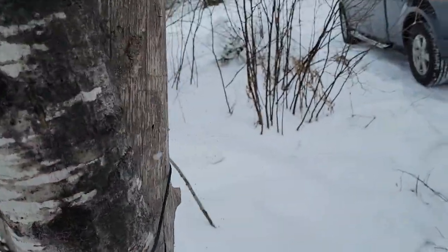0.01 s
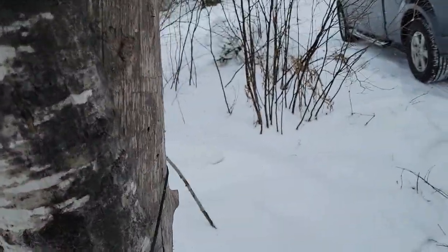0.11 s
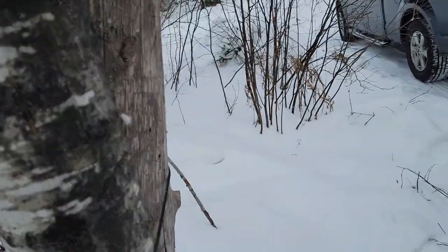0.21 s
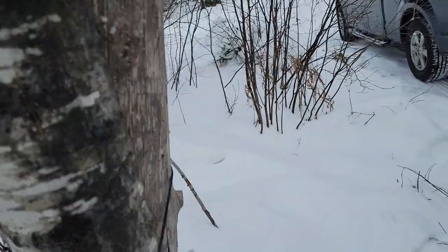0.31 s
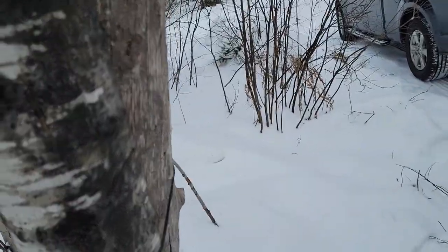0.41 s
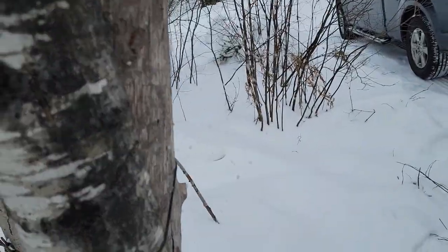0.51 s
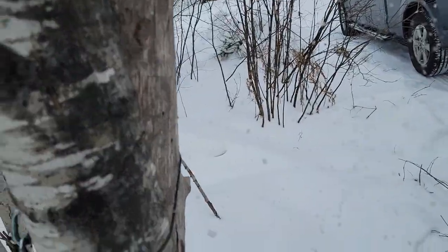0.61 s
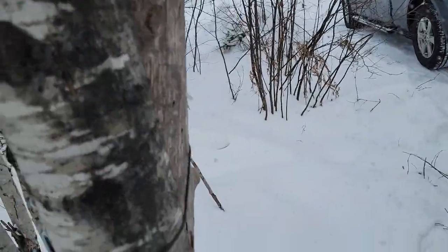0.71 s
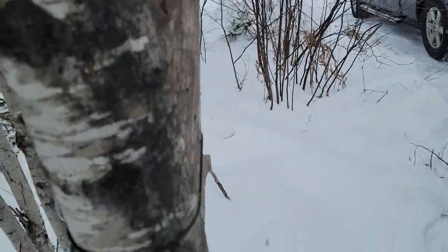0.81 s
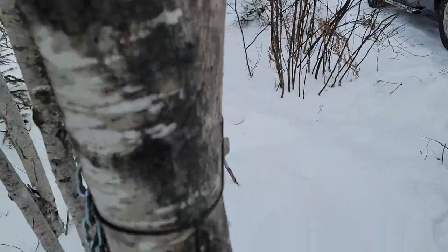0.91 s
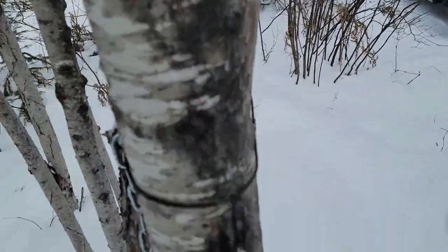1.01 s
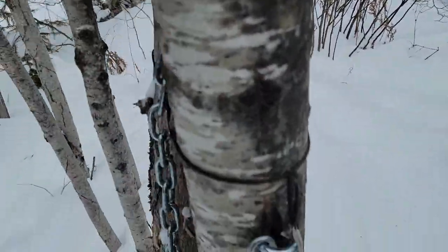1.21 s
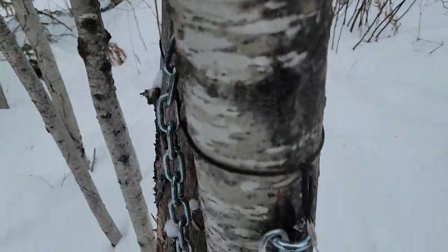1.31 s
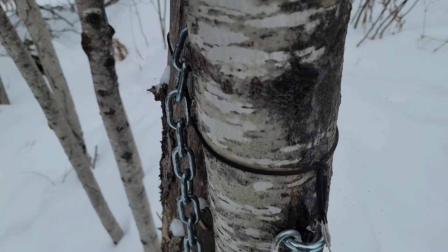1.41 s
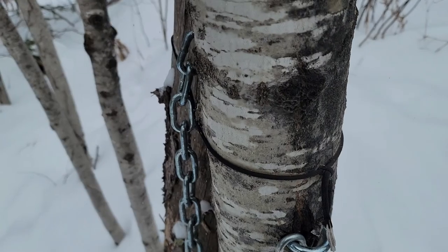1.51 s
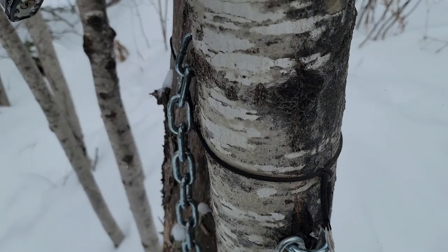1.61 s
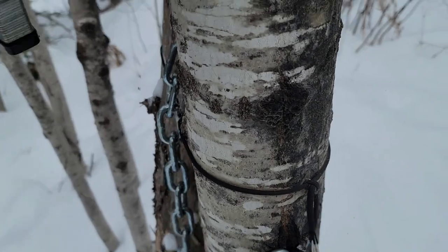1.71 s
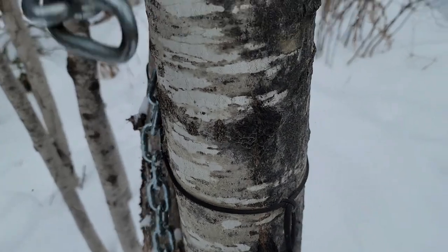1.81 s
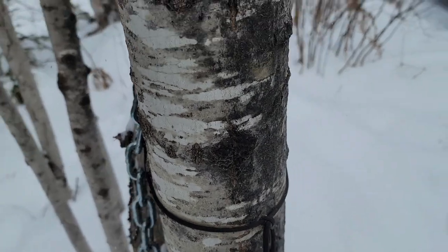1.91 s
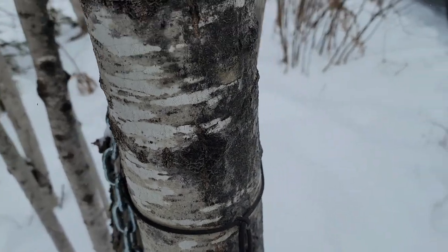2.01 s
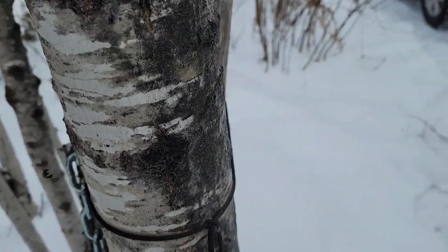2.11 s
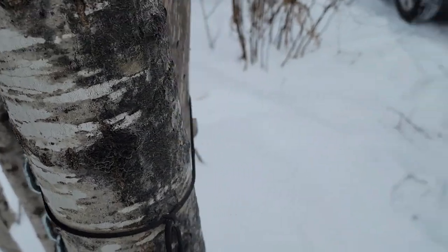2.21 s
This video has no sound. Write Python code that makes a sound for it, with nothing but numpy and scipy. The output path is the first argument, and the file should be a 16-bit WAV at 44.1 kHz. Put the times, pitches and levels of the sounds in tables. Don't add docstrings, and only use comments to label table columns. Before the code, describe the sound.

A steel chain clinks and rattles in thin, very high, short rings as it is lifted and wound around a tree; boots crunch and crack snow, then a link knocks wood. Close stereo phone microphone, open snowy woods.

```python
import sys
import numpy as np
from scipy import signal
from scipy.fft import rfft, irfft
from scipy.io import wavfile
from scipy.ndimage import map_coordinates

SR = 44100
rng = np.random.default_rng(int(sys.argv[2]) if len(sys.argv) > 2 else 0)


def transcribe(signal):
    frames = np.atleast_2d(signal).T
    limited = np.clip(frames, -1, 1)
    pcm = np.round(limited * 32767).astype(np.int16)
    wavfile.write(sys.argv[1], SR, pcm)


def nominal_scale(level):
    x = np.asarray(level, float) / 20
    return 10 ** x


N = 99225
TIME_S = np.arange(N) / SR


def track(points):
    at, value = np.array(points, float).T
    return np.interp(TIME_S, at, value)


def grains(shape, rate):
    scatter_db = 2.5
    chance, size = rng.random((2,) + shape)
    clicks = (chance < rate / SR) * np.sign(chance - rate / SR / 2)
    clicks = clicks * nominal_scale(-scatter_db * np.log(size + 1e-6))
    return clicks / clicks.std()


def colour(x, points):
    hz, db = np.array(points, float).T
    log_hz = np.log(np.linspace(1, SR / 2, 2049))
    cepstrum = irfft(np.interp(log_hz, np.log(hz), db) * np.log(10) / 20)
    cepstrum[1:2048] *= 2
    cepstrum[2049:] = 0
    impulse = irfft(np.exp(rfft(cepstrum)))
    y = signal.fftconvolve(x, impulse)[:len(x)]
    return y / y.std()


def resonance(x, hz, q):
    b, a = signal.iirpeak(hz, q, fs=SR)
    y = signal.lfilter(b, a, signal.lfilter(b, a, x))
    return y / y.std()


def band_pass(x, order, low_hz, top_hz):
    return signal.sosfilt(signal.butter(order, [low_hz, top_hz], "band", fs=SR, output="sos"), x)


def swell(at, db, rise, t60):
    t = TIME_S - at
    climb_db = 40 * t / (3 * max(rise, 0.0005))
    fall_db = -60 * t / max(t60, 0.01)
    return nominal_scale(db + np.where(t < 0, climb_db, fall_db))


def ring(at, hz, db, t60):
    y, start = np.zeros(N), int(at * SR)
    t = np.arange(N - start)[:SR // 2] / SR
    decay = nominal_scale(-60 * t / np.maximum(t60, 0.003)[:, None])
    y[start:start + len(t)] = nominal_scale(db) @ (np.sin(2 * np.pi * np.outer(hz, t)) * decay)
    return y


def ports(x, pan_db, lag_s):
    late = map_coordinates(x, [np.arange(N) - lag_s * SR], order=5, mode="nearest")
    return np.array([x * nominal_scale(pan_db / 2), late * nominal_scale(-pan_db / 2)])


def wind():
    # start_s, level_db
    gust_levels = [
        (0.0, -50.5),
        (1.33, -36),
        (2.25, -60),
    ]
    # freq_hz, level_db (per Hz)
    air_colour = [(12, -61), (20, -47.5), (65, -17), (119, -14.5), (908, -21.5), (3000, -33.5),
                  (3900, -81.5), (6600, -120)]
    # start_s, level_db
    hand_levels = [
        (0.0, -44),
        (0.11, -31.5),
        (1.08, -45.5),
        (1.16, -30),
        (2.25, -55),
    ]
    shared_colour = [(20, -34.5), (62, -3.5), (160, -8.5), (300, -6.5), (900, -70.5), (4000, -120)]
    port_colour = [(20, -18.5), (60, -9.5), (120, -16), (400, -43), (4000, -120)]
    air = nominal_scale(track(gust_levels)) * colour(rng.standard_normal(N), air_colour)
    hand = nominal_scale(track(hand_levels))
    shared = hand * colour(rng.standard_normal(N), shared_colour)
    apart = hand * np.array([colour(rng.standard_normal(N), port_colour) for _ in "LR"])
    return air + nominal_scale(-6.5) * shared + nominal_scale(-8.5) * apart


def snow_layer(snow, events, q, under_db):
    out = np.zeros((2, N))
    for at, db, rise, t60, hz in events:
        near = slice(max(int(at * SR) - SR // 3, 0), min(int(at * SR) + SR, N))
        start = rng.integers(0, 2 * N)
        patch = snow[:, start:start + near.stop - near.start]
        undertone = resonance(patch, hz * 0.585, 3.45)
        burst = resonance(patch, hz, q) + nominal_scale(under_db) * undertone
        out[:, near] += swell(at, db, rise, t60)[near] * burst
    return out


def boots():
    # start_s, level_db, rise_s, t60_s, centre_hz
    packing = [(0.018, -37.5, 0.1, 0.49, 553), (0.108, -27.5, 0.0035, 0.14, 625),
               (0.199, -25.5, 0.025, 0.52, 430), (0.286, -14, 0.066, 0.69, 783),
               (0.418, -23.5, 0.021, 0.19, 600), (.6, -35.5, 0.058, 3.8, 480),
               (0.686, -22, 0.0057, 0.053, 760), (0.801, -24.5, 0.0017, 0.53, 970),
               (0.889, -25.5, 0.023, 0.11, 600), (1.166, -23.5, 0.03, 0.27, 620),
               (1.3, -31.5, 0.012, 1.23, 536), (1.418, -16.5, 0.0042, 0.049, 443),
               (1.5, -28.5, 0.1, 1.034, 1126), (2.002, -57, 0.0081, 0.62, 470)]
    # start_s, level_db, rise_s, t60_s, centre_hz
    crunching = [(0.214, -26, 0.051, 0.64, 2560), (0.299, -18, 0.0036, 0.58, 2290),
                 (0.367, -14, 0.045, 0.15, 2980), (0.548, -37, 0.018, 0.98, 2740),
                 (0.683, -26.5, 0.025, 0.16, 2800), (0.8, -2, 0.0019, 0.024, 1650),
                 (0.817, -17, 0.032, 0.39, 2670), (0.888, -15, 0.0099, 0.25, 1670),
                 (1.033, -26.5, 0.042, 0.42, 2370), (1.125, -16, 0.022, 0.29, 2040),
                 (1.176, -26, 0.011, 0.85, 2050), (1.293, -14.5, 0.001, 0.028, 2700),
                 (1.323, -23, 0.036, 0.15, 2810), (1.411, -12.5, 0.0012, 0.091, 1990),
                 (1.425, -6, 0.0016, 0.028, 2920), (1.454, -17, 0.042, 0.38, 2430),
                 (1.523, -23, 0.025, 0.43, 2330), (1.6, -35, 0.035, 0.37, 2150),
                 (2.069, -65.5, .04, 0.28, 1920)]
    # start_s, level_db, rise_s, t60_s, centre_hz
    sliding = [
        (1.46, -22.5, 0.038, 0.28, 2160),
        (1.53, -22, 0.024, 0.45, 2310),
        (1.63, -30.5, 0.057, 0.28, 2380),
        (1.685, -32.5, 0.024, 0.086, 2260),
        (1.75, -41, 0.07, 0.66, 1990),
        (1.75, -41, 0.1, 1, 1250),
        (2.06, -50, 0.025, 0.12, 2070),
        (.37, -22.5, 0.066, 0.22, 832),
        (.375, -22, 0.054, 0.22, 3200),
    ]
    # start_s, level_db, rise_s, t60_s
    cracking = [
        (.3, -42.5, 0.029, 0.12),
        (0.378, -28.5, 0.062, 0.18),
        (.6, -50.5, 0.055, 1),
        (.81, -32.5, .01, 0.23),
        (0.892, -26.5, 0.029, 0.14),
        (1.294, -32.5, .002, 0.21),
        (1.425, -31.5, .002, .05),
        (1.448, -26, 0.028, 0.35),
        (1.53, -41.5, .02, 0.19),
    ]
    # freq_hz, level_db
    crust_colour = [(2500, -8), (3800, 2.5), (4600, 3.5), (7000, 3), (8200, -4.5), (15000, -10.5),
                    (16000, -24.5)]
    # start_s, pan_db (left over right), lag_ms (right port late)
    feet_path = [
        (0, 3, 0.26),
        (.4, 10.5, 0.31),
        (.9, -3.5, .23),
        (1.2, -8, .1),
        (1.5, -9, 0.0081),
        (2.25, -10, 0.018),
    ]
    snow = grains((2, 3 * N), 2500)
    steps = snow_layer(snow, packing, 0.9, -60)
    steps += snow_layer(snow, crunching, 2.2, -4.5)
    steps += snow_layer(snow, sliding, 4.5, -60)
    steps = band_pass(steps, 3, 198, 3830)
    cracks = sum(swell(*row) for row in cracking)
    steps += cracks * np.array([colour(side, crust_colour) for side in snow[:, :N]])
    feet, aside = steps
    at, pan_db, lag_ms = np.array(feet_path, float).T
    placed = ports(feet, np.interp(TIME_S, at, pan_db), np.interp(TIME_S, at, lag_ms) / 1000)
    width_db = -3.5
    return placed + nominal_scale(width_db) * aside * [[1], [-1]]


def link_rings():
    # freq_hz, level_db
    link_modes = [(11300, -24), (12640, -7), (12735, -4), (12810, -13.5), (13100, -8.5), (13200, -14.5),
                  (13310, -10), (13450, -5.5), (13565, -2.5), (13770, 6.5), (13880, -6.5), (14300, -21)]
    # start_s, level_db
    jingle_levels = [(0, -52), (.2, -46), (.45, -36.5), (.52, -56), (.8, -31), (1.0, -33), (1.3, -43.5),
                     (1.5, -35.5), (1.98, -37.5), (2.06, -65), (2.25, -66)]
    # start_s, level_db, rattle_t60_s, tilt_db (upper over lower
    strikes = [(0.0308, -54, 0.046, 4), (0.0817, -58, 0.07, 1.0), (0.1106, -41, 0.07, 1.0),
               (0.1216, -38, 0.07, 1.0), (0.1511, -28.5, 0.06, -1.5), (0.174, -19, 0.059, -1),
               (0.2024, -4.5, 0.12, 3), (0.222, -14, 0.087, 3.5), (0.251, -25, 0.055, 8),
               (0.2788, -28, 0.085, -0.5), (0.2982, -21, 0.083, 5), (0.3187, -20.5, 0.088, 7),
               (0.3484, -23, 0.11, 2), (0.3884, -17, 0.065, -3.5), (0.43, -24.5, 0.055, 2.5),
               (0.5207, -28.5, 0.056, 7), (0.549, -45, 0.07, 1.0), (0.567, -14, 0.049, -3),
               (0.579, -14.5, 0.06, 5), (0.6114, -29, 0.07, 1.0), (0.656, -15, 0.07, -1.5),
               (0.683, -7, 0.1, 5), (0.703, -6, 0.1, 1.0), (0.7227, -12.5, 0.062, 3.5),
               (0.7447, -7, 0.05, 6), (0.7614, -18.5, 0.055, 0.5), (0.7934, -32.5, 0.07, 2),
               (0.8235, -10.5, 0.096, 2), (0.851, -13, 0.07, -2.5), (0.87, -14.5, 0.096, -0.5),
               (0.9505, -30, 0.07, 5), (0.9804, -34, 0.044, 7), (1.0228, -12.5, 0.07, 5),
               (1.0382, 3, 0.11, 8.5),
               (1.0548, -3, 0.091, -4), (1.0714, -3, 0.075, 8), (1.096, -4, 0.1, 6),
               (1.1248, -7.5, 0.14, 7), (1.208, -27, 0.055, -5), (1.288, -31, 0.07, -1),
               (1.318, -27, 0.054, -7), (1.3458, -35, 0.033, 3), (1.3698, -28, 0.07, -2),
               (1.394, -27, 0.07, 1.0), (1.412, -15, 0.081, -2), (1.4605, -13, 0.058, -1),
               (1.492, -11, 0.096, 4), (1.514, -3.5, 0.082, 0), (1.5336, -14.5, 0.052, -2),
               (1.5514, -4, 0.083, 3), (1.5754, -11, 0.12, 6), (1.6276, -9, 0.056, 1.0),
               (1.6562, -25, 0.031, -15), (1.691, -26, 0.074, -4), (1.7, -13, 0.063, -1),
               (1.718, -18, 0.054, 3), (1.765, -23, 0.082, 1.0), (1.786, -6.5, 0.079, 5),
               (1.8037, -8.5, 0.081, -2), (1.8483, -4.5, 0.055, -2.5), (1.8687, -11, 0.07, 4),
               (1.8844, -11, 0.091, 4), (1.915, -5, 0.068, -1), (1.9375, 2, 0.17, 7),
               (1.9582, -23, 0.17, 1.0), (1.9837, -7.5, 0.046, 6), (2.2075, -31, 0.079, 3),
               (2.2396, -30.5, 0.07, 8)]
    spread_hz, ring_s, scatter_db, chain_db = 33.9, 0.064, 1.5, -4
    strike_db, rattle_db, jingle_db, contact_rise_s = -3.5, -20.5, -35, 0.0044
    hz, db = np.repeat(link_modes, 2, axis=0).T
    hz = hz + spread_hz * np.cos(np.arange(len(hz)) * 2.4)
    contacts = grains((len(hz), N), 700)
    drive = nominal_scale(db + jingle_db)[:, None] * nominal_scale(track(jingle_levels)) * contacts
    for at, hit_db, t60, tilt_db in strikes:
        size, sign = rng.standard_normal((2, len(hz)))
        tilt = tilt_db * np.clip(hz - 13250, -600, 600) / 1000
        own = nominal_scale(db + tilt + scatter_db * size)
        own = own * nominal_scale(chain_db) / np.linalg.norm(own)
        hit = int(at * SR)
        near = slice(max(hit - SR // 20, 0), hit + SR // 4)
        rattle = swell(at, hit_db + rattle_db, contact_rise_s, t60)[near]
        drive[:, near] += own[:, None] * rattle * contacts[:, near]
        drive[:, hit] += own * np.sign(sign) * nominal_scale(hit_db + strike_db)
    mode_t60 = ring_s * nominal_scale(2 * np.cos(hz))
    poles = np.exp(2j * np.pi * hz / SR - np.log(1000) / (mode_t60 * SR))
    modes = np.array([signal.lfilter([1], [1, -p], x).imag for p, x in zip(poles, drive)])
    links = np.array([modes[::2].sum(axis=0), modes[1::2].sum(axis=0)])
    skirt_db = -5
    skirt = signal.sosfilt(signal.butter(4, 11000, "high", fs=SR, output="sos"), links)
    return band_pass(links, 3, 12300, 14200) + nominal_scale(skirt_db) * skirt


def link_ticks():
    # start_s, level_db
    tick_times = [(0.0293, -39), (0.0952, -42), (0.2024, -24), (0.2199, -23), (0.2523, -22),
                  (0.2952, -18.5), (0.5114, -43), (0.5192, -37), (0.5462, -43), (0.5641, -35.5),
                  (0.6374, -50), (0.6444, -33), (0.6799, -26), (0.7432, -28), (0.7851, -32.5),
                  (0.9807, -34), (1.0106, -31), (1.036, -24), (1.1004, -26), (1.2201, -36), (1.7, -36.5),
                  (1.713, -32), (1.7484, -42.5), (1.7614, -43), (1.7774, -44), (1.7853, -39), (1.8023, -42),
                  (1.8274, -41.5), (1.8482, -33.5), (1.8584, -51.5), (1.8816, -39), (1.9071, -24),
                  (1.935, -22.5), (1.9674, -33.5), (1.9849, -38.5), (2.2054, -47), (2.2358, -48.5)]
    # freq_hz, level_db
    tick_colour = [(2500, -15), (4000, -6.5), (7000, -2.5), (9500, -11), (11500, -4.5), (14500, -12.5),
                   (16000, -8)]
    tick_db, rise_s, t60_s = -9.5, 0.0011, 0.074
    bursts = sum(swell(at, db + tick_db, rise_s, t60_s) for at, db in tick_times)
    return bursts * colour(rng.standard_normal(N), tick_colour)


def chain():
    # start_s, pan_db (left over right)
    chain_path = [
        (0, 8.5),
        (.9, 7.5),
        (1.101, 4.5),
        (1.63, 4.5),
        (1.9, 7),
    ]
    pan_db, lag_s = track(chain_path), 0.0005994
    first, second = link_rings()
    return ports(first + link_ticks(), pan_db, lag_s) + ports(second, pan_db - 3, lag_s + 0.000025)


def knock():
    # start_s, level_db
    raps = [
        (1.951, -16),
        (1.9547, -13),
        (1.9599, -15.5),
    ]
    # freq_hz, level_db, t60_s
    trunk_modes = [(302, -20, 0.19), (454, 2, 0.023), (720, -6.5, 0.018), (1011, 0.5, 0.016),
                   (7100, 9, 0.0017)]
    hz, db, t60 = np.array(trunk_modes).T
    wood = sum(ring(at, hz, db + hit_db - 14, t60) for at, hit_db in raps)
    return ports(wood, 25, 0.00021)


def scene():
    return wind() + boots() + chain() + knock()


def low_pass(x):
    return signal.sosfilt(signal.butter(12, 16480, fs=SR, output="sos"), x)


def record(dry):
    x = signal.sosfilt(signal.ellip(8, 0.2, 80, 16000, fs=SR, output="sos"), dry)
    x = signal.resample_poly(x, up=2, down=1, axis=1)
    x = np.tanh(0.81 * x) / 0.61
    x = signal.resample_poly(x, up=1, down=2, axis=1)
    return low_pass(x)


dry = scene()
out = record(dry)
transcribe(out)
```